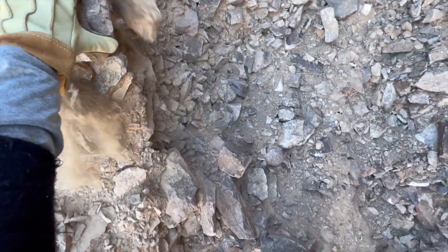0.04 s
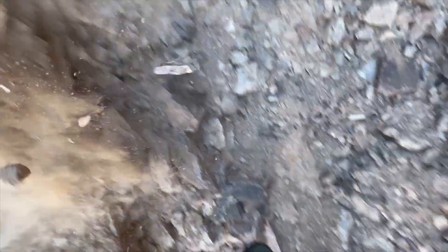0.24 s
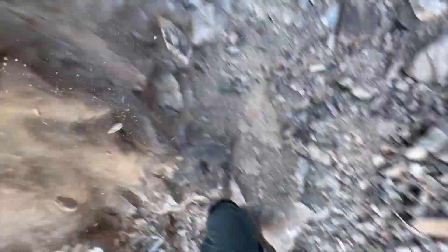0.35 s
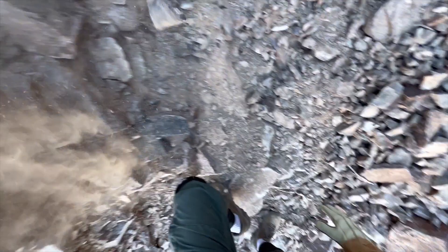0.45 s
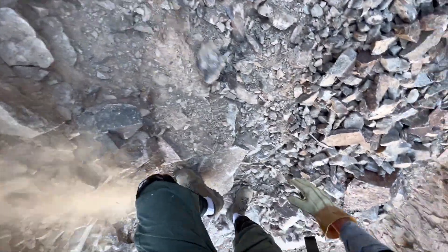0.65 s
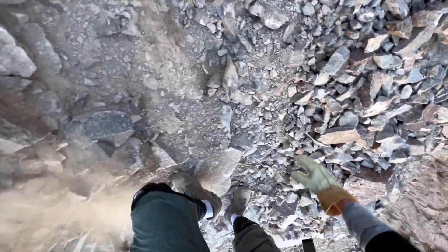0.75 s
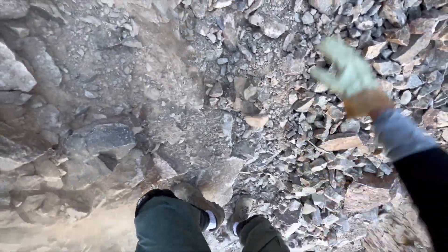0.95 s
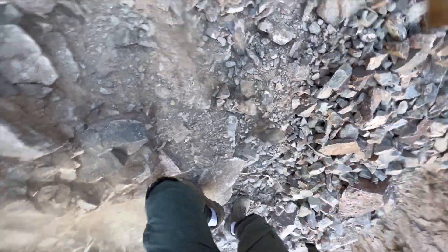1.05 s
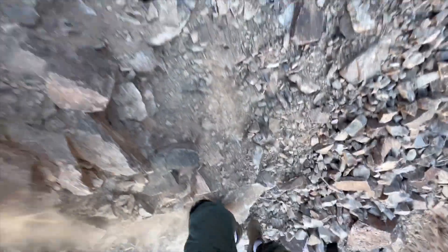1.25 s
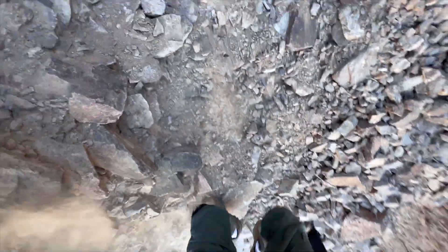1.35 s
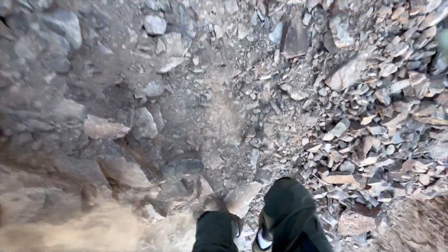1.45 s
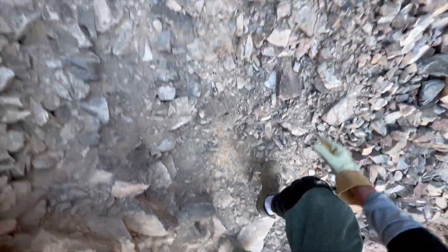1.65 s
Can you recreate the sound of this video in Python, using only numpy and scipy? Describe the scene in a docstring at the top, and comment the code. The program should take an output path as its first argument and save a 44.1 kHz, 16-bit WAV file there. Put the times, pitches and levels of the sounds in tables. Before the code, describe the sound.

Loose rock breaking away under gloves and boots on a steep slope: a faint start, then a sudden dense clatter at 0.3 seconds, followed by scattered clinks, snaps and trickling grit, close and dry in stereo outdoors.

```python
"""Loose rock on a steep slope

Loose rock breaks away under gloved hands and boots, close to a camera with two microphones.
Grit and dust slide throughout: clumped showers of tiny grains over hiss, with low noise rumbling beneath.
Chips tick and edges crack as shaped noise bursts; stones knock as short ringing modes with a scatter of
fragments; the larger ones thud into the soil as rough low tones that glide down."""
import sys
import numpy as np
from scipy import signal
from scipy.fft import rfft, irfft, next_fast_len
from scipy.io import wavfile
from scipy.ndimage import uniform_filter1d

SR = 44100
rng = np.random.default_rng(int(sys.argv[2]) if len(sys.argv) > 2 else 0)


def gain_from_decibels(decibels):
    """Convert decibel values to linear amplitude factors."""
    exponent = np.asarray(decibels, float) / 20
    return 10 ** exponent


def master_out(mix):
    """Clip the mix to full scale and print it as 16-bit PCM to the path in sys.argv[1]."""
    frames = np.transpose(np.atleast_2d(mix))
    ceiling = np.clip(frames, -1, 1)
    pcm = np.round(ceiling * 32767).astype(np.int16)
    wavfile.write(sys.argv[1], SR, pcm)


N = 74970  # length in samples

# Sliding debris. Each row: time in seconds, level of coarse gravel in dB, level of fine grit in dB.
SLIDE_LEVELS = [(0, -50.5, -47), (.09, -61.5, -54.5), (0.288, -52, -43.5), (0.301, -18.5, -24),
                (.34, -44, -38.5), (.6, -49.5, -35), (0.683, -39, -37), (.89, -45, -41), (.95, -38, -33.5),
                (1.031, -39.5, -32), (1.117, -51.5, -48), (1.162, -24, -24), (1.196, -41.5, -37.5),
                (1.43, -45, -38), (1.7, -45, -43)]
# Tone of the coarse gravel. Each row: frequency in Hz, gain in dB.
GRAVEL_COLOUR = [(150, 0), (350, -4), (2500, -0.5), (4000, -12.5), (8000, -51)]
# Tone of the fine grit. Each row: frequency in Hz, gain in dB.
GRIT_COLOUR = [(1500, -46), (3000, -2), (9000, 1.5), (12000, 1), (17000, 4)]
# Ground and wind rumble. Each row: time in seconds, level in dB.
RUMBLE_LEVELS = [(0, -56.5), (.27, -63), (.33, -51.5), (1.03, -53.5), (1.09, -39), (1.2, -51),
                 (1.52, -55.5), (1.6, -49.5)]
# Tone of the rumble. Each row: frequency in Hz, gain in dB.
RUMBLE_TONE = [(15, -25), (75, -0.5), (180, -5.5), (700, -31.5)]
# Tiny bright chips. Each row: time of the peak in seconds, peak level in dB.
CHIPS = [(0.1492, -26), (0.2425, -7), (0.2918, -5.5), (0.3438, -11.5), (0.4648, -15.5), (0.641, -5.5),
         (0.7694, -9), (0.7922, -5), (0.8718, -12), (0.903, -16.5), (1.069, -17), (1.1222, -13),
         (1.2058, -13.5), (1.3909, -9), (1.4115, -14), (1.571, -23)]
# Brittle edges that snap. Each row: time of the peak in seconds, peak level in dB, centre in Hz.
EDGES = [(0.1799, -27, 3680), (0.2666, -24, 5940), (0.2929, -13.5, 6220), (0.3134, -9, 5620),
         (0.4081, -3.5, 8700), (0.4395, -18, 4700), (0.4913, -10.5, 6000), (0.5076, -8, 5900),
         (0.582, -16, 3700), (0.6062, -17, 4570.0), (0.6423, -11, 8200), (0.6605, -4.5, 6100),
         (0.6908, -7, 4910), (0.7028, -13.5, 6140), (0.7706, -12, 4820), (0.7959, -6, 4120),
         (0.8585, -12.5, 4600), (0.9375, -4.5, 4300), (0.9659, -20.5, 8100), (0.969, -9.5, 6260),
         (1.1378, -3.5, 4800), (1.1547, -10.5, 6350), (1.1639, -12, 3840), (1.2398, -15.5, 6080),
         (1.3634, -20.5, 8300), (1.39, -9.5, 5100), (1.408, -7, 4870), (1.4124, -1, 8700),
         (1.4819, -19, 6200)]
# Stones that ring briefly. Each row: time of full level in seconds, peak of the ring in dB, main mode in Hz.
STONES = [(0.2933, -12.5, 2150), (0.2937, -7, 1045), (0.2963, -17, 600), (0.3118, -9.5, 990),
          (0.312, -6, 1786), (0.3251, -19.5, 1530), (0.3729, -20, 2810), (0.4076, -24, 820),
          (0.5106, -26.5, 323), (0.555, -7, 1886), (0.5556, -8.5, 1149), (0.559, -15, 413),
          (0.6633, -7, 2110), (0.6638, -14, 910), (0.6749, -14, 1290), (0.6848, -23, 300.0),
          (0.7036, -15.5, 2210), (0.7566, -11.5, 2160), (0.7957, -23, 1550), (0.884, -28.5, 2270),
          (0.92, -23, 385), (0.929, -19, 2340), (0.9365, -7.5, 2400), (0.938, -23, 757),
          (0.9697, -19, 1684), (1.006, -20, 2600), (1.0153, -20, 2200), (1.138, -23.5, 823),
          (1.153, -19.5, 870), (1.1639, -13, 2700), (1.1709, -24, 2830), (1.238, -26.5, 604),
          (1.364, -18.5, 2210), (1.391, -9.5, 2920), (1.393, -21, 575), (1.3945, -19.5, 1190),
          (1.4122, -13.5, 2890), (1.5429, -26, 2240), (1.5767, -22.5, 1426)]
# Modes of a 1500 Hz stone. Each row: nominal ratio to the main mode, level in dB, 60 dB decay in seconds.
STONE_MODES = [(0.621, -14, 0.007), (0.999, 7.5, 0.0074), (1.5, -2, 0.0054), (2.01, 0.5, 0.0037)]
# Heavy stones landing in soil. Each row: start in seconds, level in dB, final pitch in Hz.
LANDINGS = [(0.295, -20, 91), (0.322, -26, 90), (0.408, -32.5, 89), (0.558, -27, 69.4), (0.67, -32, 75),
            (0.936, -32, 81), (1.162, -35, 85)]
# Where the stones fall. Each row: time in seconds, lead of low sounds at the left microphone in seconds,
# left minus right in dB.
BEARINGS = [(.45, .00018, 1), (.93, .00003, -3.5), (1.2, -.00015, -2.5), (1.39, .00012, 2), (1.55, 0, -1)]
# The camera body shades each microphone differently. Each row: frequency in Hz, left minus right in dB.
BODY_SHADE = [(1500, 0.5), (4500, 1.5), (7000, 4.5), (8500, -4), (14000, 2)]
# Tone of both microphones. Each row: frequency in Hz, gain in dB.
MIC_COLOUR = [(15, -22), (60, 1.5), (7200, 2), (7650, -6), (8100, 4.5), (8700, 4.5), (9400, 3),
              (10800, -9.5), (12200, -2), (14500, -7.5), (16000, -8.5), (16700, -60)]

TICK_HZ, TICK_TOP_DB, TICK_TAIL_DB = 13300, -3.5, -8
CRACK_TOP_DB, CRACK_TAIL_DB = -7.5, -13
# Ticks and cracks share these; the width is a fraction of the centre, the level that of its edges.
SNAP_RISE_S, SNAP_T60_S, SNAP_TAIL_T60_S = 0.0012, 0.0074, 0.065
SNAP_WIDTH, SNAP_EDGE_DB = 0.051, -11
KNOCK_RISE_S = 0.001206  # for a 1500 Hz stone
KNOCK_TAIL_DB, KNOCK_TAIL_T60_S = -12, 0.08
THUD_RISE_S, THUD_T60_S = 0.005, 0.15  # the rise is a time constant
THUD_GLIDE_HZ, THUD_GLIDE_S = 384, 0.0091  # start above the final pitch, time constant of the fall
THUD_ROUGH = 0.46  # rms phase wobble in radians


def evened(x):
    """Brings a sound to an rms of one."""
    return x / np.sqrt(np.mean(x ** 2) + 1e-20)


def colour(x, points):
    """Filters along the last axis by a curve of (Hz, dB)."""
    size = next_fast_len(x.shape[-1] + 2048)
    f, db = np.transpose(points)
    log_hz = np.log(np.fft.rfftfreq(size, 1 / SR) + 1)
    gain = gain_from_decibels(np.interp(log_hz, np.log(f), db))
    return irfft(rfft(x, size) * gain, size)[..., :x.shape[-1]]


def fade(t, t60):
    """Exponential decay by 60 dB in t60 seconds, never quicker than 2 ms."""
    return gain_from_decibels(-60 * t / max(t60, .002))


def likeness(a, same):
    """Two signals that share the part same of the first."""
    same = np.clip(same, -1, 1)
    return np.array([a[0], same * a[0] + np.sqrt(1 - same ** 2) * a[1]])


def lumpy(noise, size):
    """Smooths noise twice over size samples into slow lumps with an rms of one."""
    return evened(uniform_filter1d(uniform_filter1d(noise, size=size), size=size))


def bearing(s):
    """Time lead in seconds and level balance in dB at moment s."""
    t, lead_s, pan_db = np.transpose(BEARINGS)
    return np.interp(s, t, lead_s), np.interp(s, t, pan_db)


def add(mix, s, pair, pan_db, lead_s):
    """Places a pair of sounds left and right with a level and time offset."""
    for k, side in enumerate((1, -1)):
        start = max(round((s - side * lead_s / 2) * SR), 0)
        part = mix[k, start:][:pair.shape[1]]
        part += gain_from_decibels(side * pan_db / 2) * pair[k, :len(part)]


def debris(column, points, per_s, spread_db, lo_hz, hi_hz, cycles, dust_db, same):
    """Many small particles, each a few cycles long and arriving in clumps, over a smooth hiss of dust."""
    out, t = np.zeros((2, N)), np.arange(600) / SR
    clumps = gain_from_decibels(7 * evened(uniform_filter1d(rng.standard_normal(N), size=150)))
    chance = per_s * clumps / clumps.mean() / 20 / SR  # per sample, shared by 20 grain pitches
    for hz in np.geomspace(lo_hz, hi_hz, num=20):
        env = (1 - np.exp(-t * hz)) * np.exp(-t * hz / cycles)
        grain = np.sin(2 * np.pi * hz * t) * env * np.sqrt(hz)
        strength = gain_from_decibels(spread_db * np.minimum(rng.exponential(1, (2, N)), 4))
        hit = strength * (rng.random((2, N)) < chance)
        # the right side shares some hits, a few samples early or late
        shared = same * np.roll(hit[0], rng.integers(-12, 13))
        hit[1] = shared + np.sqrt(1 - min(same, 1) ** 2) * hit[1]
        out += signal.oaconvolve(hit, grain[None], axes=1)[:, :N]
    dust = likeness(rng.standard_normal((2, N)), same)
    out = evened(out) + gain_from_decibels(dust_db) * dust
    curve = np.transpose(SLIDE_LEVELS)
    level_db = np.interp(np.arange(N) / SR, curve[0], curve[column])
    return gain_from_decibels(level_db) * evened(colour(out, points))


def rumble():
    """Lumpy low noise, largely shared by both microphones."""
    z = rng.standard_normal((3, N))
    lumps = gain_from_decibels(2.5 * lumpy(z[2], 900))
    level = gain_from_decibels(np.interp(np.arange(N) / SR, *np.transpose(RUMBLE_LEVELS)))
    return level * lumps * evened(colour(likeness(z, 0.65), RUMBLE_TONE))


def snaps(rows, top_db, tail_db, same, lead_s):
    """A snap of noise around a broad centre, with a weaker lumpy tail of chips."""
    out, t = np.zeros((2, N)), np.arange(2500) / SR
    noise = rng.standard_normal((len(rows), 3, 2500))
    chance = rng.uniform(-1, 1, (len(rows), 2))
    w = 1 + SNAP_WIDTH
    edge_db, treble_db = SNAP_EDGE_DB, SNAP_EDGE_DB + top_db
    after = np.maximum(t - SNAP_RISE_S, 0)
    rise = np.minimum(t / SNAP_RISE_S, 1) ** 2
    for (s, db, hz), z, c in zip(rows, noise, chance):
        shape = [(hz / 8, -35), (hz / w / 1.55, edge_db - 1.0), (hz / w, edge_db), (hz, 0),
                 (hz * w, edge_db), (hz * w * 2.7, treble_db), (hz * 8, treble_db)]
        lumps = gain_from_decibels(3.5 * evened(uniform_filter1d(z[2], size=60)))
        tail = gain_from_decibels(tail_db) * lumps * fade(after, SNAP_TAIL_T60_S)
        env = rise * (fade(after, SNAP_T60_S) + tail)
        sound = env * colour(likeness(z, same), shape)
        sound = gain_from_decibels(db) * sound / abs(sound).max()
        # each snap strays up to 3 dB from the bearing's balance
        add(out, s - SNAP_RISE_S, sound, bearing(s)[1] + 3 * c[0], lead_s * c[1])
    return out


def ticks():
    """Small chips: very bright snaps, mostly different left and right."""
    rows = [(s, db, TICK_HZ) for s, db in CHIPS]
    return snaps(rows, TICK_TOP_DB, TICK_TAIL_DB, same=0.32, lead_s=0)


def cracks():
    """Brittle edges: snaps largely shared by both sides, with a small random time offset."""
    return snaps(EDGES, CRACK_TOP_DB, CRACK_TAIL_DB, same=0.84, lead_s=.00025)


def knocks():
    """A few short modes of each stone, with a scatter of fragments around its pitch."""
    out, t = np.zeros((2, N)), np.arange(3000) / SR
    chance = rng.random((len(STONES), len(STONE_MODES), 2))
    noise = rng.standard_normal((len(STONES), 2, 3000))
    for (s, db, hz), c, z in zip(STONES, chance, noise):
        bulk = (1500 / hz) ** .5  # larger, lower stones speak more slowly and ring longer
        rise = KNOCK_RISE_S * bulk
        after = np.maximum(t - rise, 0)
        ring = np.zeros((2, len(t)))
        for (ratio, mode_db, t60), (u, v) in zip(STONE_MODES, c):
            mode_hz = hz * ratio ** (0.846 + 0.34 * u)  # no two stones are shaped alike
            offset = (v - .5) * np.array([[0], [1]])  # phase on the right
            ring += gain_from_decibels(mode_db) * fade(after, t60 * bulk) * np.sin(2 * np.pi * mode_hz * t + offset)
        ring = ring * np.minimum(t / rise, 1) ** 2
        shape = [(hz / 8, -30), (hz / 2, -7), (hz, 0), (hz * 2, -9), (hz * 8, -30)]
        bits = evened(colour(likeness(z, 0.16), shape))
        bits = bits * fade(t, KNOCK_TAIL_T60_S) * np.minimum(t / rise, 1)
        sound = ring / abs(ring).max() + gain_from_decibels(KNOCK_TAIL_DB) * bits
        lead_s, pan_db = bearing(s)
        add(out, s - rise, gain_from_decibels(db) * sound, pan_db, lead_s)
    return out


def thuds():
    """A rough low push through the ground: the deepest part arrives last."""
    out, t = np.zeros((2, N)), np.arange(6000) / SR
    turns = rng.random(len(LANDINGS))
    noise = rng.standard_normal((len(LANDINGS), 2, 6000))
    for (s, db, end_hz), turn, z in zip(LANDINGS, turns, noise):
        hz = end_hz + THUD_GLIDE_HZ * np.exp(-t / THUD_GLIDE_S)
        wobble = THUD_ROUGH * lumpy(z, 200)  # roughens phase and level
        phase = 2 * np.pi * (np.cumsum(hz) / SR + turn) + wobble[0]
        env = (1 - np.exp(-t / THUD_RISE_S)) * fade(t, THUD_T60_S) * gain_from_decibels(3.8 * wobble[1])
        pair = np.sin(phase + np.array([[0], [.6]]))
        add(out, s, gain_from_decibels(db) * env * pair, .7, 0)
    return out


def scene():
    """Sums the sliding debris, the rumble and every stone."""
    gravel = debris(column=1, points=GRAVEL_COLOUR, per_s=700, spread_db=3.5, lo_hz=300, hi_hz=4930,
                    cycles=2.8, dust_db=1, same=0.35)
    grit = debris(column=2, points=GRIT_COLOUR, per_s=3500, spread_db=3.0, lo_hz=2572, hi_hz=15640,
                  cycles=5.3, dust_db=-6, same=0.76)
    return gravel + grit + rumble() + ticks() + cracks() + knocks() + thuds()


def low_pass(x):
    """Removes everything above the highest recorded frequency."""
    return signal.sosfilt(signal.butter(12, 16800, fs=SR, output="sos"), x)


def record(dry):
    """Shading by the camera body, microphone colour, then the full-scale limit."""
    shaded = np.array([colour(x, [(hz, side * db / 2) for hz, db in BODY_SHADE])
                       for x, side in zip(dry, (1, -1))])
    mix = np.clip(colour(shaded, MIC_COLOUR), -1, 1)
    return low_pass(mix)


dry = scene()
out = record(dry)
master_out(out)
```